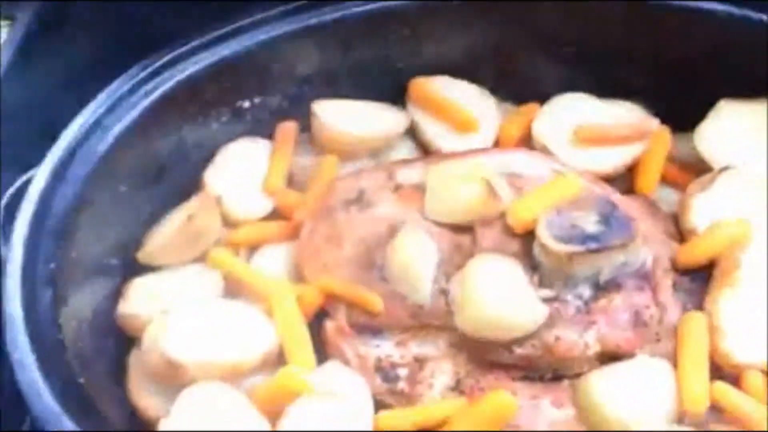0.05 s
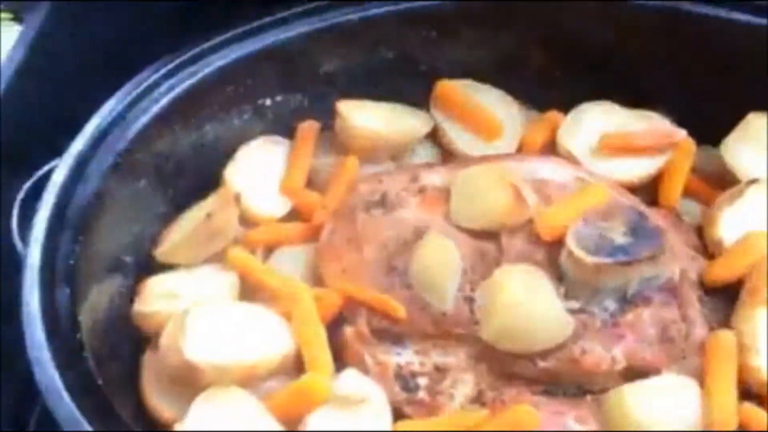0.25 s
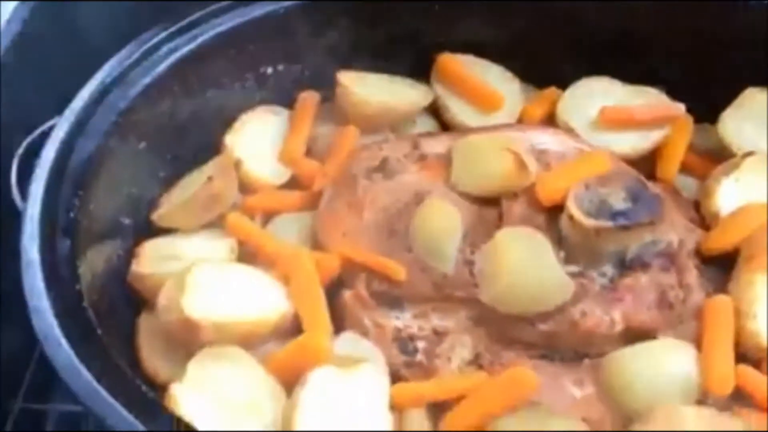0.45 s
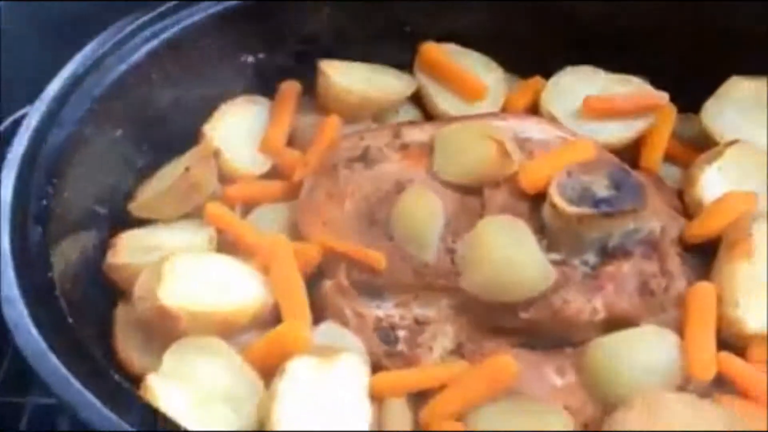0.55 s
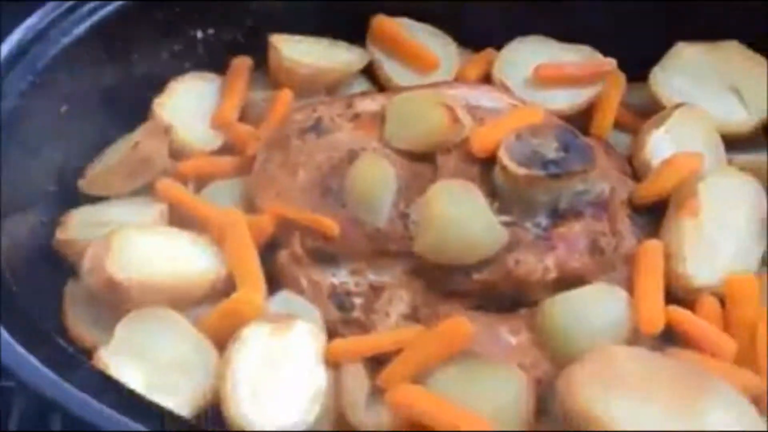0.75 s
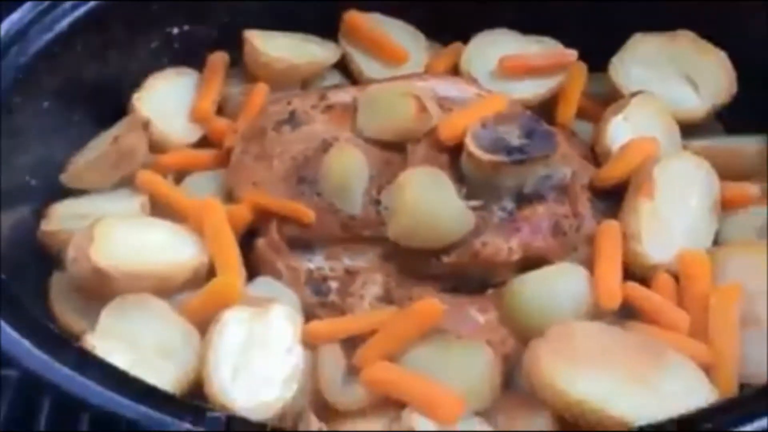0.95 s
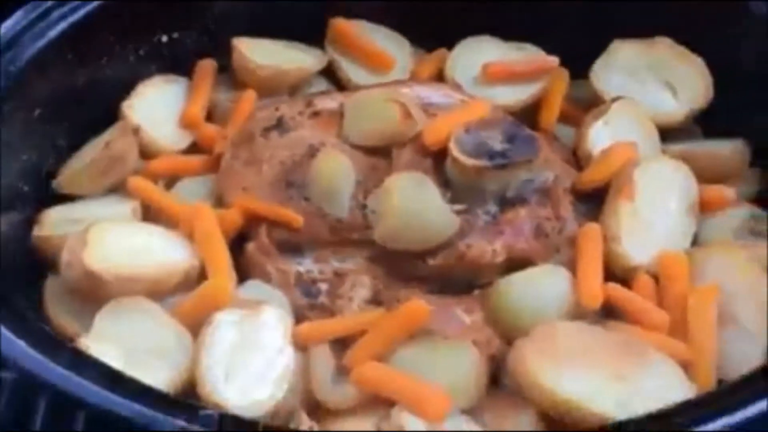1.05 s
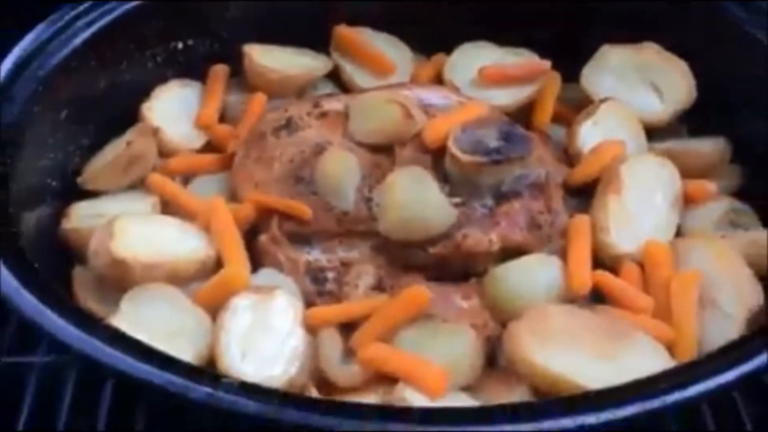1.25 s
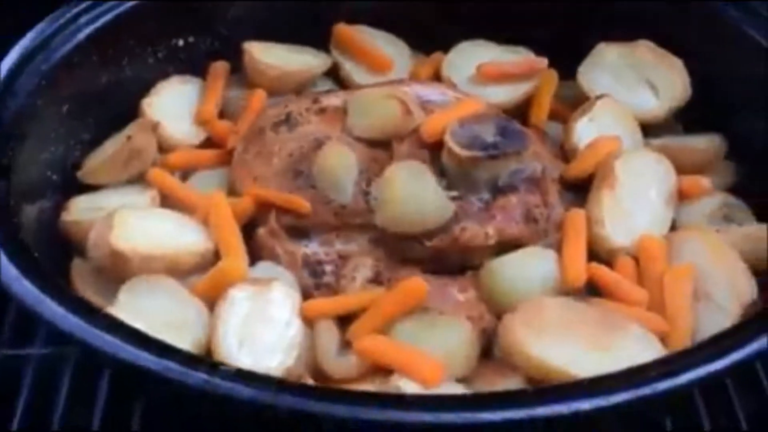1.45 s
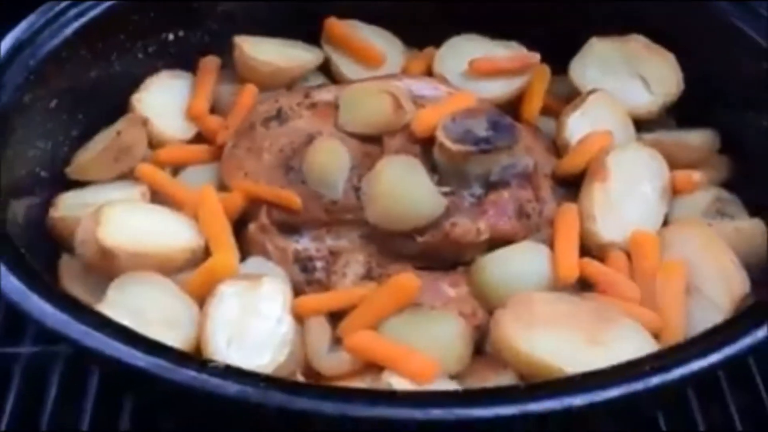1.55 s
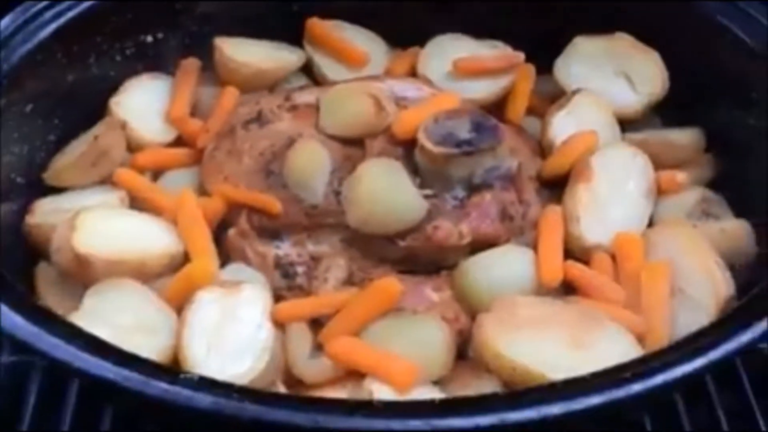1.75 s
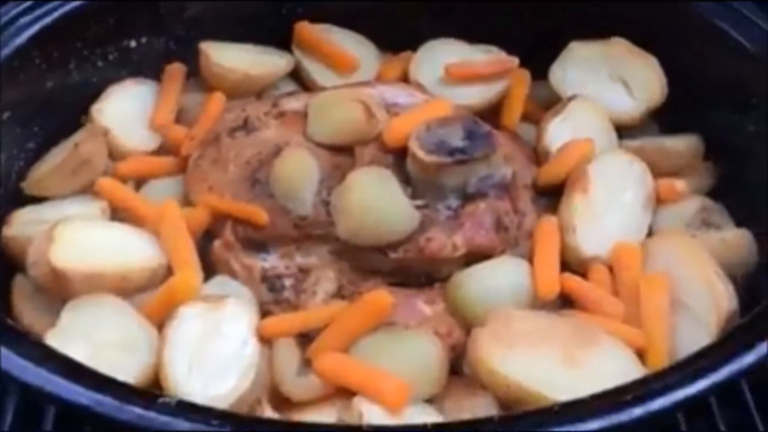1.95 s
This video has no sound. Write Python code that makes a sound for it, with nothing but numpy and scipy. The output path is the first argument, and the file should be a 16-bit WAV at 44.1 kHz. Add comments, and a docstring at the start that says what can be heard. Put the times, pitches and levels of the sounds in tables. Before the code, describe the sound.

A metal barbecue lid bumps with a loud, hollow boom at about 0.2 seconds, close by, after a few faint ticks. Loose metal rattles with it and scrapes briefly around 0.4 seconds, and the ringing fades over about a second. From then until 2 seconds, hot fat ticks, spits and sizzles quietly in a roasting pan, with a few soft bumps. A faint hiss and low outdoor rumble lie underneath.

```python
"""A faint tick or two, then a boom: a barbecue's metal lid bumps against its stop, close by, outdoors.
The bump sets the lid ringing for about a second, while loose metal chatters and then scrapes briefly.
Hot fat ticks, spits and sizzles in the roasting pan.
Behind it all lie a faint hiss and a low outdoor rumble."""
import sys
import numpy as np
from scipy import signal
from scipy.fft import rfft, irfft
from scipy.io import wavfile

SR = 44100
rng = np.random.default_rng(int(sys.argv[2]) if len(sys.argv) > 2 else 0)


def inscribe(sig):
    """Save sig as 16-bit PCM at rate SR to the path in sys.argv[1].

    A 1-D sig is mono; a 2-D sig holds one channel per row.
    Samples are clipped to [-1, 1] before scaling.
    """
    pcm = np.round(np.clip(np.atleast_2d(sig).T, -1, 1) * 32767)
    wavfile.write(sys.argv[1], SR, pcm.astype(np.int16))


N = 88200  # two seconds

# Blows on the lid (time [s], level [dB], contact time [ms])
LID_BLOWS = [(0.213, -15.5, 0.7), (0.2234, 1.5, 0.94), (0.276, -19, 1.1), (0.303, -6, 1.76),
             (0.391, -16.5, 1.7), (0.4207, -19, .5)]
# The lid's main tones; a fade is the time to drop by 60 dB (pitch [Hz], level [dB], fade [s])
LID_TONES = [(64, -17, 0.15), (118.9, -11.5, 0.3), (135, -20, 0.4), (179.1, -19, 1.57), (222, -11, 0.26),
             (268.8, -34.5, 2.5), (293.3, -10, 0.25), (306, -11, 0.29), (331.4, -19, 0.52),
             (391, -16, 0.25), (429.7, -36, 1.6), (445.8, -17, 0.38), (614, -42, 1.1), (677, -25.5, 1.3),
             (809, -23, 0.83)]
# The lid's many weaker tones (frequency [Hz], relative level [dB], fade [s])
LID_WEAK_TONES = [(30.2, -31, 2), (74, -14.5, 3.73), (162, -6.5, 2.28), (230, -1, 1.6), (356, -5, 1.42),
                  (440, -3, 1.5), (524, -15.5, 1.6), (880, -13.5, 1.3), (1500, -17, 0.86), (4000, -54, .8)]


def lid():
    """Each blow sets the lid's tones ringing; a longer contact sounds duller."""
    t, force = np.arange(N) / SR, np.zeros(N)
    for time, db, contact_ms in LID_BLOWS:
        push = np.exp(-((t - time) / (contact_ms / 1000 / 2)) ** 2)
        force += amp(db) * push / push.sum()
    main = sum(amp(db) * fade_out(t, fade) * np.sin(2 * np.pi * hz * t) for hz, db, fade in LID_TONES)
    weak = amp(-17.5) * dense_ring(LID_WEAK_TONES)
    main_rise_s, weak_rise_s = 0.0028, 0.014
    ring = main * np.minimum(t / main_rise_s, 1) + weak * np.minimum(t / weak_rise_s, 1)
    return signal.fftconvolve(force, ring)[:N]


# Thuds of the lid, then soft handling bumps (middle time [s], level [dB], pitch [Hz], half-length [s])
LID_THUDS = [(0.2295, -1.5, 240, 0.0048), (0.231, -12.5, 69, 0.017), (0.274, -20, 62, 0.013),
             (.458, -25.5, 76.5, .016), (0.667, -29.5, 72, .025), (1.332, -41, 170, 0.012),
             (1.632, -42, 115, 0.0074), (1.824, -37.5, 113, 0.013), (1.926, -33, 99.5, 0.012)]


def thuds():
    """The whole lid flexes or rocks: a few soft, deep swings each time."""
    t, out = np.arange(N) / SR, np.zeros(N)
    for time, db, hz, half_length in LID_THUDS:
        swell = np.exp(-((t - time) / half_length) ** 2)
        out += amp(db) * swell * np.sin(2 * np.pi * hz * (t - time))
    return out


# Tone colour of the loose metal's buzz (frequency [Hz], relative level [dB])
BUZZ_COLOUR = [(200, 6), (600, 9.5), (1200, 4), (2000, 5), (3300, 1.5), (5200, -3.5), (6300, 0),
               (9000, -0.5), (15000, -2.5)]
# Thin metal ringing on after the buzz (frequency [Hz], relative level [dB], fade [s])
SHEET_RING = [(395, 5.5, 1.83), (830, 7.5, 0.99), (1930, 0, 1.08), (3780, 7, 0.51), (5100, -1, 1.08),
              (7300, -10, 1.33), (11000, -14, .75), (15000, -14, .6)]


def chatter():
    """The jolt makes loose metal buzz; the thin sheet rings on."""
    buzz = coloured(clicks(per_s=5000, spread_db=0.5), BUZZ_COLOUR)
    buzz *= burst(start_s=0.232, db=-19.5, hold_s=0.021, fade_s=0.15, rise_s=0.0019)
    ring = dense_ring(SHEET_RING)
    ring /= np.linalg.norm(ring)
    return buzz + amp(-6) * signal.fftconvolve(buzz, ring)[:N]


# Scrapes of metal on metal (time [s], level [dB], hold [s], fade [s])
METAL_SCRAPES = [(0.223, -34, 0.0092, .03), (0.4155, -29, 0.03, 0.069), (0.456, -35.5, 0.03, 0.064),
                 (0.543, -47.5, 0.056, 0.56)]
# Tone colour of the rubbing (frequency [Hz], relative level [dB])
RUB_COLOUR = [(300, 6), (800, 10.5), (1500, 2), (2500, 2.5), (4200, -1), (5500, -4.5), (7500, -3.5),
              (11000, -15.5), (15000, -30)]
# Tones of the hinge (pitch [Hz], width [Hz], relative level [dB])
HINGE_TONES = [(1354, 22, -13.5), (2690, 53, -12), (3141, 31, -8.5), (3190, 96, -17), (3670, 210, -8.5),
               (4220, 220, -9)]


def scrapes():
    """Metal slips on metal as the lid settles, ringing a few bright tones in the hinge."""
    slips = clicks(per_s=5000, spread_db=0.5)
    rub, f = coloured(slips, RUB_COLOUR), np.fft.rfftfreq(N, 1 / SR)
    for hz, width, db in HINGE_TONES:
        tone = irfft(rfft(slips) / (1 + 2j * (f - hz) / width), N)
        rub += amp(db) * unit_level(tone)
    return unit_level(rub) * sum(burst(*row, rise_s=0.0017) for row in METAL_SCRAPES)


# Small knocks, ticks and spits (time [s], peak level [dB], pitch [Hz], width [octaves], fade [s])
TICKS_AND_SPITS = [(.034, -27, 5330, 0.63, 0.045), (0.109, -29, 3500, 0.67, .02),
                   (0.141, -19.5, 940, 0.51, 0.069), (0.1427, -22.5, 600, 0.83, 0.086),
                   (.877, -29, 677, 0.93, 0.075), (1.214, -23, 1950, 0.28, 0.027),
                   (1.432, -27, 2020, .9, 0.068), (1.433, -27.5, 4740, 0.11, 0.077),
                   (1.667, -33.5, 265, 0.53, 0.034), (1.682, -31.5, 4870, 0.64, 0.037),
                   (1.712, -30, 1270, 0.12, 0.04), (1.713, -35, 2700, 0.25, 0.042),
                   (1.764, -35.5, 245, 0.4, 0.024), (1.885, -21.5, 7800, 2.4, .006)]


def ticks(size=8192):
    """Each tick is a snap and a quick puff of noise, strongest around one pitch."""
    out, t, f = np.zeros(N), np.arange(size) / SR, np.fft.rfftfreq(size, 1 / SR) + 1
    for time, db, hz, octaves, fade in TICKS_AND_SPITS:
        snap = rng.standard_normal(size) * fade_out(t, fade)
        snap *= amp(0.5) / np.linalg.norm(snap)
        snap[0] += 1  # the sharp start
        hump = np.exp(-.5 * (np.log2(f / hz) / octaves) ** 2)
        skirt = amp(-8.5) / (1 + f / hz) ** .9  # a weaker, wide spread that thins toward the treble
        log_gain = np.log(hump + skirt)
        # build the filter so that nothing sounds before the snap
        mirrored = np.r_[log_gain, log_gain[-2:0:-1]]
        response = np.exp(np.conj(signal.hilbert(mirrored)))[:len(f)]
        tick = irfft(rfft(snap) * response)
        add(out, time, amp(db) * tick / abs(tick).max())
    return out


# Short fizzes of fat (time [s], level [dB], hold [s], fade [s])
FAT_FIZZES = [(0.17, -41, 0.021, .015), (0.538, -52.5, .04, 0.1), (1.394, -51, .015, 0.047),
              (1.775, -26.5, 0.007, .012), (1.858, -46.5, 0.031, 0.033)]
# Tone colour of the fizzes (frequency [Hz], relative level [dB])
FAT_FIZZ_COLOUR = [(500, -13), (3000, -12), (5500, -11.5), (7000, 3.5), (10000, -3), (12000, -12),
                   (15000, -6.5)]
# Tone colour of the sizzle (frequency [Hz], relative level [dB])
FAT_SIZZLE_COLOUR = [(500, 11), (2500, -1), (5000, -4), (7500, 1.5), (10000, -3.5), (15000, -14)]


def fat():
    """Hot fat gives a few short, bright fizzes and a faint sizzle that swells and ebbs."""
    fizz = coloured(rng.standard_normal(N), FAT_FIZZ_COLOUR)
    fizz *= sum(burst(*row, rise_s=0.0036) for row in FAT_FIZZES)
    sizzle = coloured(clicks(per_s=2700, spread_db=2), FAT_SIZZLE_COLOUR)
    sizzle_db = -56.5 + 3.5 * drift(3.254, 24.86)
    return fizz + sizzle * amp(sizzle_db)


# Tone colour of the outdoor background (frequency [Hz], relative level [dB])
AIR_COLOUR = [(20, -1), (45, -3.5), (70, -6), (115, 1), (170, -9), (300, -17), (550, -21), (1200, -20.5),
              (2500, -23), (5000, -26), (8000, -30), (12000, -33), (15000, -33)]
# How the low rumble rises and falls (time [s], level change [dB])
RUMBLE_SWELLS = [(0, 4), (.2, 4), (1.2, 0.5), (1.55, -3), (1.72, 5), (1.9, -3), (2.0, -4.5)]


def air(rumble_top_hz=306):
    """The outdoor background: a steady hiss over a rumble that swells unevenly."""
    noise = coloured(rng.standard_normal(N), AIR_COLOUR)
    bass_filter = 1 / (1 + (np.fft.rfftfreq(N, 1 / SR) / rumble_top_hz) ** 2)
    rumble = irfft(rfft(noise) * bass_filter, N)
    hiss = noise - rumble
    swell_db = np.interp(np.arange(N) / SR, *np.transpose(RUMBLE_SWELLS)) + 0.5 * drift(4, 12)
    return amp(-45.5) * (hiss + rumble * amp(swell_db))


def amp(db):
    """Turns decibels into a number to multiply by."""
    return 10 ** (np.asarray(db) / 20)


def unit_level(x):
    """Scales a sound to an average (rms) level of 1."""
    return x / np.sqrt(np.mean(x ** 2) + 1e-20)


def fade_out(t, fade_s):
    """A curve that drops by 60 dB every fade_s seconds."""
    return np.exp(-np.log(1000) * t / fade_s)


def burst(start_s, db, hold_s, fade_s, rise_s):
    """A loudness curve that rises, holds until hold_s after its start, then fades."""
    t = np.arange(N) / SR - start_s
    return amp(db) * np.clip(t / rise_s, 0, 1) * fade_out(np.maximum(t - hold_s, 0), fade_s)


def look_up(table, hz, column=1):
    """Reads a table at any frequency, sliding evenly in pitch between its rows."""
    table = np.array(table, float)
    return np.interp(np.log(hz + 1), np.log(table[:, 0] + 1), table[:, column])


def coloured(x, table):
    """Gives a sound a tone colour (its balance of low and high), at level 1."""
    gain = amp(look_up(table, np.fft.rfftfreq(len(x), 1 / SR)))
    return unit_level(irfft(rfft(x) * gain, len(x)))


def dense_ring(table):
    """Many close tones blur into noise, each band fading at its own speed."""
    noise = coloured(rng.standard_normal(N), table)
    hz, t, bands = signal.stft(noise, SR, nperseg=1024)
    fades = look_up(table, hz, column=2)[:, None]
    return signal.istft(bands * fade_out(t, fades), SR, nperseg=1024)[1][:N]


def clicks(per_s, spread_db):
    """A random stream of tiny clicks of uneven size."""
    size = amp(spread_db * np.minimum(rng.exponential(1, N), 4))
    return unit_level(size * rng.choice([-1., 1.], N) * (rng.random(N) < per_s / SR))


def drift(low_hz, high_hz):
    """A random wander made of slow waves, at level 1."""
    t, rates = np.arange(N) / SR, np.geomspace(low_hz, high_hz, 20)
    return unit_level(sum(np.sin(2 * np.pi * (hz * t + rng.random())) for hz in rates))


def add(mix, time, sound):
    """Mixes a sound in at a time in seconds."""
    part = mix[max(round(time * SR), 0):][:len(sound)]
    part += sound[:len(part)]


def scene():
    """All the sounds together, close by, in one channel."""
    return (lid() + thuds() + chatter() + scrapes() + ticks() + fat() + air())[None]


def record(dry, low_hz=38.2, top_hz=14950, ceiling=0.92):
    """The microphone drops the deepest bass; loud peaks are rounded off and the top treble is cut."""
    x = signal.sosfilt(signal.butter(2, low_hz, "highpass", fs=SR, output="sos"), dry)
    x = x / (1 + (x / ceiling) ** 8) ** (1 / 8)
    treble_cut = signal.firwin(511, top_hz, window=("kaiser", 9), fs=SR)
    return signal.oaconvolve(x, treble_cut[None], "same")


dry = scene()
out = record(dry)
inscribe(out)
```